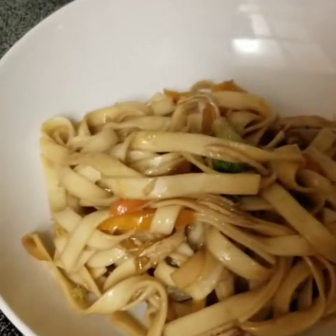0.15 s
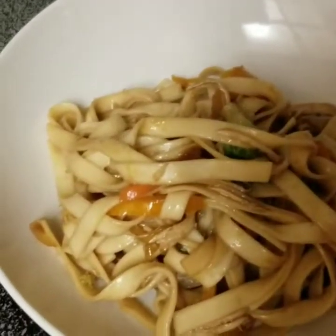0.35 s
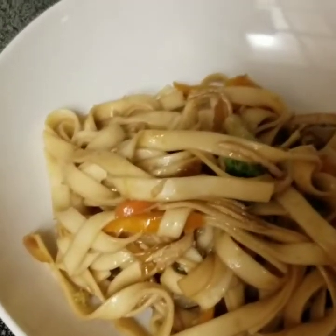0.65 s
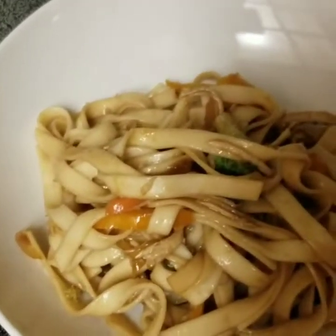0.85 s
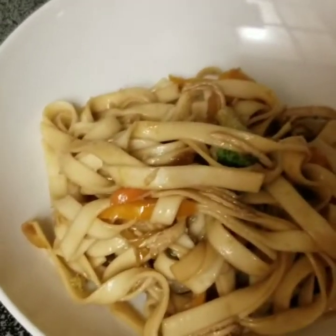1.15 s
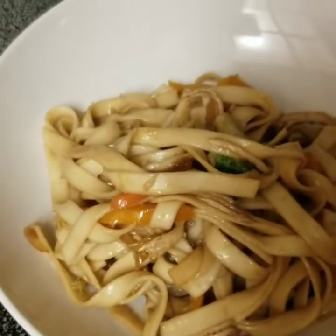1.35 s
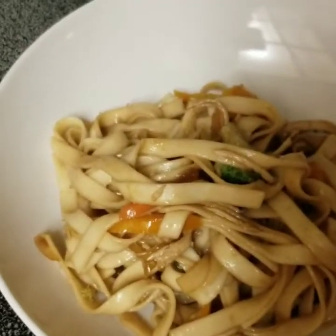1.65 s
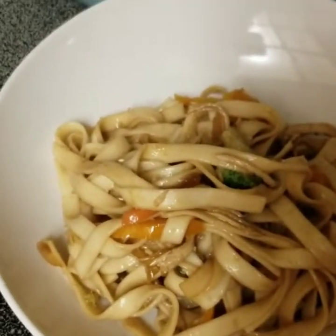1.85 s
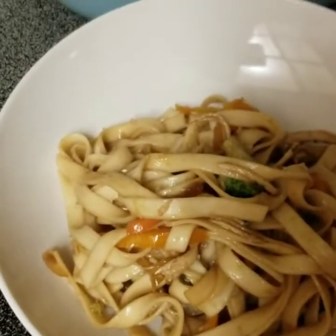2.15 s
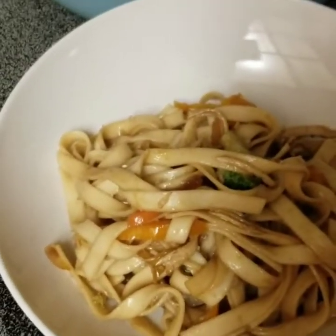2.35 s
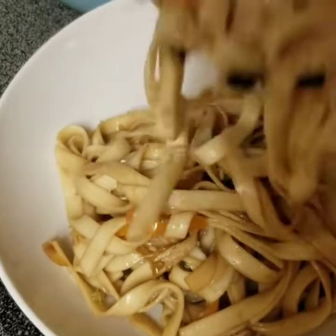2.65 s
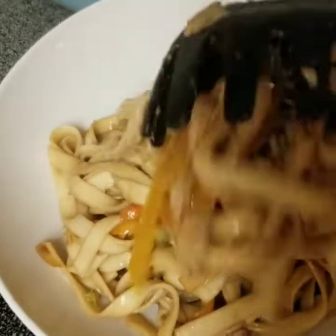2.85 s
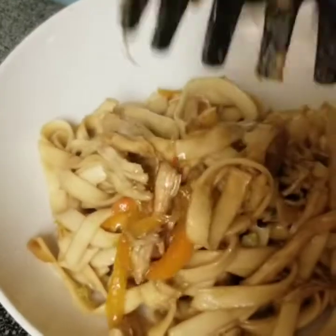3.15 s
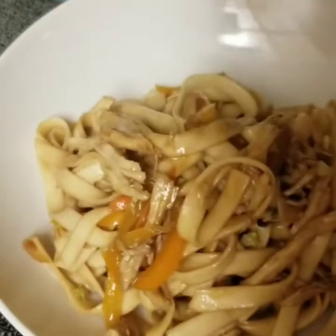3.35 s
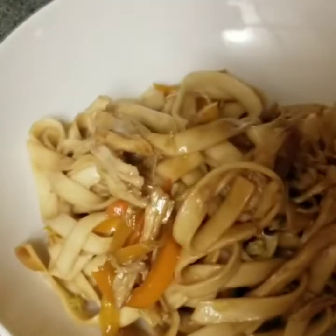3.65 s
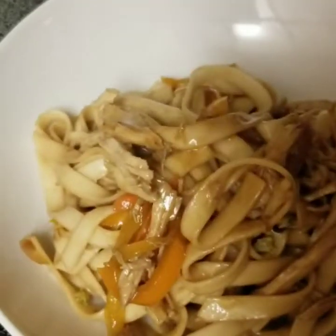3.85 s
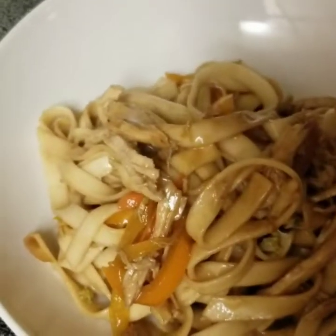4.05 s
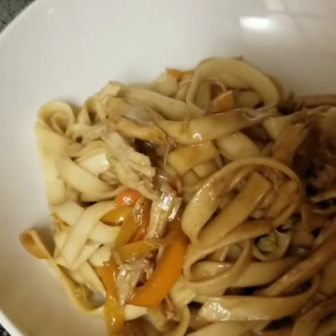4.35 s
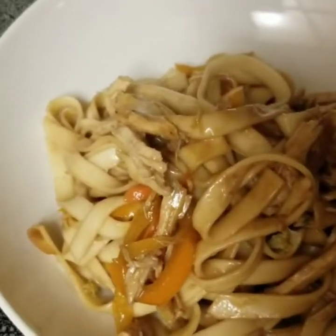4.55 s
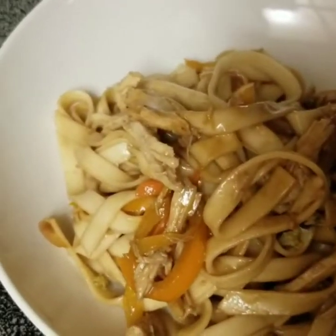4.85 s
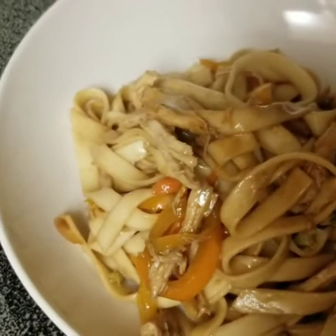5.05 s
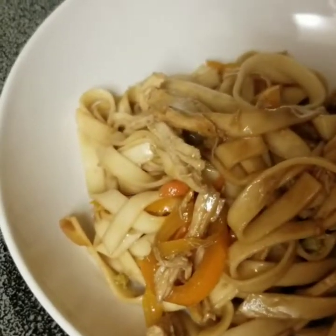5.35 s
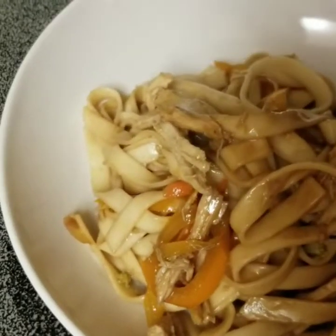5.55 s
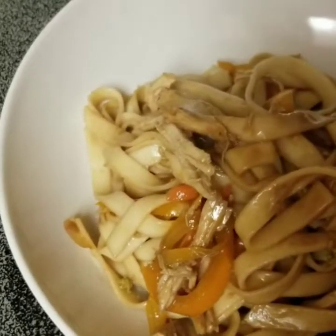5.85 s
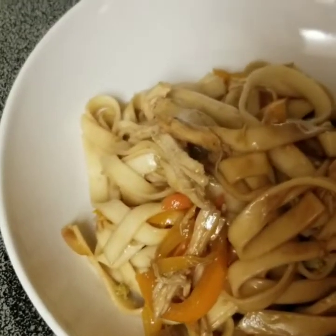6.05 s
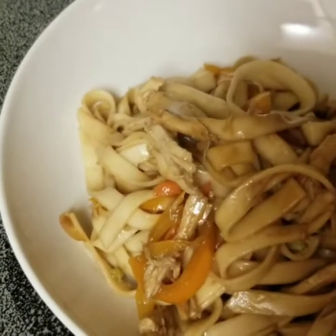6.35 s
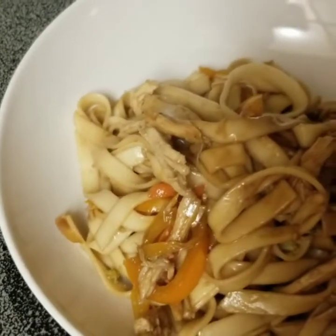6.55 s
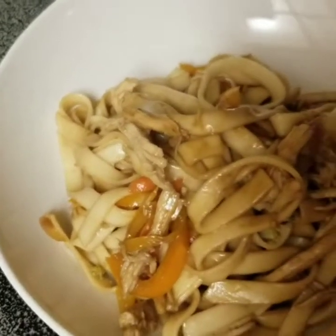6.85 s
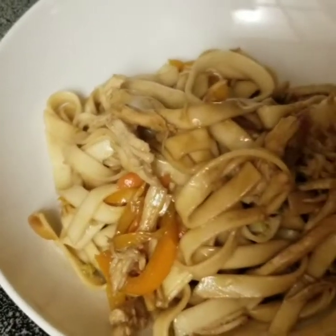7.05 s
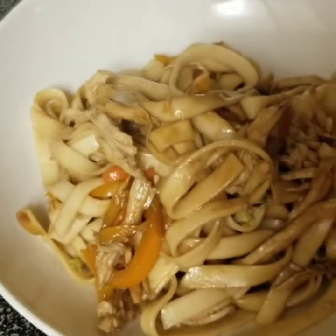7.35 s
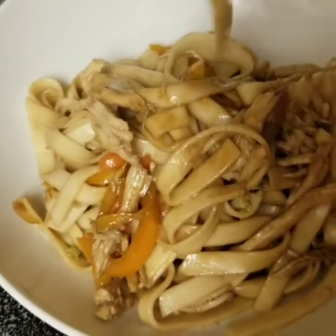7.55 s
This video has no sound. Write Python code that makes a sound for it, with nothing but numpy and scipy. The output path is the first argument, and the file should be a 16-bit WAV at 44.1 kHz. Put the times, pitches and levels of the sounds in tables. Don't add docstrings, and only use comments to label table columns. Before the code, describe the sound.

In a small kitchen, a low fan rumble and mains hum run under a faint simmering hiss. Close to the microphone, tongs strike a dish in a loud bouncing clatter near the start, with a short scrape. Small wet noodle ticks follow, then another clatter before four seconds, a short rattle, soft taps and a dense heavier clatter around five and a half. Only faint ticks and taps remain.

```python
import sys
import numpy as np
from scipy import signal
from scipy.fft import rfft, irfft, next_fast_len
from scipy.io import wavfile
from scipy.ndimage import uniform_filter1d, map_coordinates

SR = 44100
rng = np.random.default_rng(int(sys.argv[2]) if len(sys.argv) > 2 else 0)


def to_wav(sig):
    pcm = np.clip(np.atleast_2d(sig), -1, 1) * 32767
    pcm = np.round(pcm).astype(np.int16)
    wavfile.write(sys.argv[1], SR, pcm.T)


def makeup_ratio(level_db):
    decades = np.asarray(level_db, float) / 20
    return 10 ** decades


N = 340011
HZ = np.fft.rfftfreq(next_fast_len(N + SR // 2), 1 / SR)


def unit(x):
    return x / np.sqrt(np.mean(x ** 2) + 1e-20)


def along(points, hz=HZ):
    f, v = np.transpose(points)
    return np.interp(np.log(hz + 1), np.log(f + 1), v)


def curves(rows):
    s, *cols = np.transpose(rows)
    return [np.interp(np.arange(N) / SR, s, c) for c in cols]


def wobble(rate):
    knots = rng.standard_normal(int(N * rate / SR) + 4)
    return map_coordinates(knots, [np.arange(N) * rate / SR])


def filtered(x, response):
    m = next_fast_len(N + SR // 2)
    return irfft(rfft(x, m) * response, m)[..., :N]


def ringing(peaks):
    total = 0
    for k, (c, width, db) in enumerate(peaks):
        total = total + (-1) ** k * makeup_ratio(db) * 1j * HZ * width / (c * c - HZ * HZ + 1j * HZ * width)
    return total


def causal(gain):
    cepstrum = irfft(np.log(gain + 1e-6))
    half = len(cepstrum) // 2
    cepstrum[1:half] *= 2
    cepstrum[half + 1:] = 0
    return np.exp(rfft(cepstrum))


def sides(pan_db):
    return makeup_ratio(np.array([[.5], [-.5]]) * pan_db)


def ports(pair, alike, lean, lead_s=0):
    turn = np.arccos(np.clip(along(alike), -1, 1)) / 2
    mid, side = filtered(pair, np.array([np.cos(turn), np.sin(turn)]))
    lead = np.exp(np.array([[1j], [-1j]]) * np.pi * HZ * lead_s)
    return filtered(np.array([mid + side, mid - side]), sides(along(lean)) * lead)


def rush(gain, patchy_db):
    # hz, likeness
    room_alike = [(60, 1), (130, 0.91), (290, 1), (640, 0.89), (1410, -0.039), (3100, 0.11), (6820, -0.14),
                  (15000, -0.13)]
    # hz, left_over_right_db
    room_lean = [(60, 1), (110, -0.5), (200, 2), (380, 0.5), (700, -0.5), (1290, 4.5), (2380, 2),
                 (4400, 2.5), (8120, -2), (15000, -6.5)]
    z = signal.stft(rng.standard_normal((2, N)), nperseg=512)[2]
    field = uniform_filter1d(rng.standard_normal(z.shape[1:]), size=8, axis=0)
    field = uniform_filter1d(field, size=10, axis=1)
    pair = signal.istft(z * makeup_ratio(patchy_db * unit(field)), nperseg=512)[1][:, :N]
    both = ports(filtered(pair, gain), room_alike, room_lean, lead_s=0.000305)
    return both / np.sqrt(np.mean(both.mean(0) ** 2))


def fan():
    # start_s, swell_db, rumble_centre_hz
    duct = [(0, -46, 69.5), (.3, -41.5, 67.9), (.6, -49.5, 59.2), (1.2, -49, 58.4), (1.45, -56, 69.1),
            (2, -41, 76.25), (2.4, -40.5, 80.66), (2.6, -41, 58), (3.3, -44, 58), (3.55, -42, 72.1),
            (3.9, -42.5, 70.25), (4.15, -42.5, 58.97), (4.75, -42, 61.1), (5.3, -44.5, 78.05),
            (5.65, -42.5, 63.57), (6.05, -39, 61.7), (6.8, -45, 62.2), (7.2, -41.5, 69.63)]
    # hz, level_db_per_hz
    air = [(8.8, -48), (15, -29), (27, -16), (35, -11.5), (48, -7), (70, -2.5), (97, -8), (125, -8),
           (146, -16.5), (231, -11.5), (429, -22), (520, -20.5), (681, -30), (825, -27), (1500, -43),
           (1950, -55), (3300, -120)]
    swell_db, centre_hz = curves(duct)
    swell_db = swell_db - swell_db.mean()
    flutter = 4.1 + wobble(11)
    rumble_turn = 2 * np.pi * np.cumsum(centre_hz + 6 * wobble(9.8)) / SR
    rumble = unit(np.real(flutter * np.exp(1j * rumble_turn)))
    hum_swing = 5.5 + 0.32 * wobble(4.9) + .8j * wobble(24)
    hum_turn = 2 * np.pi * np.cumsum(119 + 3 * wobble(4)) / SR
    hum = unit(np.real(hum_swing * np.exp(1j * hum_turn)))
    flow = makeup_ratio(-41 + 0.15 * swell_db + 0.15 * wobble(11.0)) * rush(makeup_ratio(along(air)), patchy_db=0.6)
    return flow + makeup_ratio(-46.5 + 1.7 * swell_db) * rumble + makeup_ratio(-48.5 + 0.15 * swell_db) * hum


def hiss():
    # start_s, level_db
    simmer = [(0.0, -59.5), (0.47, -59.5), (1.33, -63.5), (2.17, -59.5), (3.13, -62), (3.35, -62.5),
              (3.99, -58), (4.14, -61), (4.76, -58), (5.26, -62), (5.39, -56.5), (5.71, -60), (5.91, -60),
              (6.18, -61), (6.61, -61), (7.54, -63), (7.71, -60.5)]
    # hz, level_db_per_hz
    dull = [(590, -47), (1000, 0.5), (1190, -9.5), (1590, -4), (1730, -8.5), (2100, -3.5), (2280, -6),
            (3590, -8), (3990, -5.5), (7000, -12.5), (9100, -66), (15400, -120)]
    # hz, level_db_per_hz
    bright = [(3530, -27), (6000, -9), (7160, -1.5), (7900, 0), (10500, -4), (12400, 1), (15100, -2),
              (16000, -5.5)]
    simmer_db, = curves(simmer)
    simmer_db = simmer_db - simmer_db.mean()
    earlier_db = 8.5 * np.exp(-np.arange(N) / SR / 0.031)
    flicker = wobble(25)
    low_db = -62 + 0.93 * simmer_db + earlier_db + .5 * flicker
    fizz_db = -63.5 + 0.66 * simmer_db + 0.97 * flicker + 1.34 * wobble(80)
    low = makeup_ratio(low_db) * rush(makeup_ratio(along(dull)), patchy_db=1.5)
    return low + makeup_ratio(fizz_db) * rush(makeup_ratio(along(bright)), patchy_db=0.6)


def steam():
    # start_s, end_s, pitch_hz, width_hz, level_db
    puffs = [
        (1.72, 3, 8000, 1200, -74),
        (0.64, 1.09, 9900, 1200, -74.5),
        (6.3, 6.75, 4100, 500, -72),
        (0.7, 1, 2150, 540, -70),
        (5.93, 6.03, 10000, 4000, -68),
        (3.93, 4, 11000, 4000, -66),
    ]
    t, fade_s = np.arange(N) / SR, 0.074
    out = np.zeros((2, N))
    for s, end, hz, width, db in puffs:
        fade = np.interp(t, [s - fade_s, s, end, end + fade_s], [0, 1, 1, 0])
        out += makeup_ratio(db) * fade * rush(np.exp(-((HZ - hz) / width) ** 2), patchy_db=4.0)
    return out


def ticks():
    # start_s, peak_db, pitch_hz, pan_db
    snaps = [(0.0633, -45, 14300, -5.5), (1.0323, -44, 11700, -14), (1.1493, -47, 11680, -12),
             (1.5707, -48, 5040, -3), (1.5994, -44, 8570, -2.5), (1.6362, -44, 12700, -3.5),
             (1.833, -45, 15300, 1), (1.9835, -49, 8620, -1.5), (2.6993, -41, 14200, -17),
             (2.7243, -50, 4756, -5), (2.7472, -33.5, 5340, -5), (2.816, -45, 4670, -4),
             (3.958, -46, 5146, -4.5), (4.0537, -47, 7970, -6), (5.0732, -44, 13030, -15),
             (5.766, -41, 7660, -8), (6.0051, -48, 5140, -1.5), (6.8018, -34.5, 10400, -9),
             (7.186, -43, 4690, -1), (2.0068, -47, 4480, -1.5), (2.8933, -50, 5580, -3.5),
             (4.7905, -46, 4190, -4), (5.727, -45, 4500, -3), (6.018, -46, 4300, -3),
             (6.186, -48, 4080, -4)]
    # start_s, peak_db, pitch_hz, pan_db, t60_s
    squelches = [(0.0827, -46, 12300, -5.0, 0.015), (0.7243, -40, 14100, -10, 0.015),
                 (0.8916, -41.5, 8800, -12, 0.013), (1.726, -37, 15500, -4.0, 0.015),
                 (2.1894, -45, 7230, -3.0, 0.015), (2.6733, -38, 15500, -8.5, 0.015),
                 (3.256, -46, 12200, -3.0, 0.015), (3.5028, -47, 13700, -3.5, 0.015),
                 (3.5623, -52, 12800, -4.0, 0.015), (3.6444, -56, 6550, -2.5, 0.015),
                 (3.6815, -46, 12000, -4.0, 0.015), (3.7489, -50, 8010, -3.5, 0.015),
                 (3.9255, -50, 13100, -3.5, 0.015), (3.9589, -41, 8340, -5.0, 0.015),
                 (3.9744, -40, 12000, -4.5, 0.015), (4.0694, -42, 14700, -4.5, 0.015),
                 (4.4861, -42, 14000, -6.5, 0.015), (5.1377, -51, 12300, -4.0, 0.015),
                 (5.5104, -42, 12700, -9, 0.015), (5.5644, -47, 8350, -8, 0.015),
                 (5.6695, -46, 12400, -5.5, 0.015), (5.6974, -51, 12400, -5.0, 0.015),
                 (5.7554, -42, 7660, -6.0, 0.015), (5.7773, -35, 12200, -16, 0.017),
                 (5.7944, -53, 13100, -4.5, 0.015), (5.9339, -47, 7530, -2.5, 0.015),
                 (5.9834, -46, 7430, -2.5, 0.015), (6.1794, -41, 13400, -5.5, 0.015),
                 (6.1854, -45, 7330, -4.5, 0.015), (6.7885, -39, 10900, 0, 0.015)]
    out, t = np.zeros((2, N + SR)), np.arange(SR // 15) / SR
    rows = [(*row, 0.0076, 1e-5) for row in snaps]
    rows += [(s, db - 3.5, *rest, .001) for s, db, *rest in squelches]
    for s, db, hz, pan_db, t60, rise_s in rows:
        b, a = signal.iirpeak(min(hz, 15000), 2.7, SR)
        shape = makeup_ratio(-60 * t / t60) * (1 - np.exp(-t / rise_s))
        burst = rng.standard_normal((2, len(t))) * shape
        shared = burst[:1] + .6 * burst
        snap = signal.lfilter(b, a, signal.lfilter(b, a, shared))
        out[:, round(s * SR):][:, :len(t)] += makeup_ratio(db) * sides(pan_db) * snap / np.abs(snap).max()
    return out[:, :N]


def catches():
    # start_s, peak_db, pitch_hz
    grabs = [
        [(0.28, -34, 964), (0.295, -30, 1300), (0.3, -32, 1350), (0.291, -40, 1400), (0.305, -31, 1380),
         (0.31, -33, 1410), (0.315, -27.5, 1440), (0.327, -35, 1040), (0.333, -35, 1030), (0.339, -30, 1000),
         (0.35, -33, 950), (0.355, -30, 960), (5.252, -36.5, 1050), (5.256, -37, 1030), (5.272, -34, 976),
         (5.294, -38, 1050), (5.306, -37, 1000), (5.311, -35, 1000), (5.32, -43, 888)],
        [(0.2994, -37, 2430), (0.298, -38, 2850), (0.304, -39, 2850), (5.291, -41, 2600), (0.3494, -42, 2620),
         (0.3554, -40, 2720), (3.7854, -37, 2130), (3.7934, -36, 2151), (5.2594, -39, 2140),
         (5.2704, -47, 2527), (5.2804, -50, 2530), (5.2854, -40, 2550), (5.2959, -32.5, 2600),
         (5.3164, -45, 2320), (6.0262, -48, 2070)],
        [(0.2838, -37, 3600), (5.1896, -47, 4100), (5.184, -45, 6800), (5.192, -42, 1210), (5.3014, -51, 4500),
         (5.7648, -48, 3360)],
    ]
    out, t = np.zeros((2, N + SR)), np.arange(SR // 16) / SR
    rise_s, t60_s = 0.003, 0.018
    shape = (1 - np.exp(-t / rise_s)) * makeup_ratio(-60 * t / t60_s)
    for s, db, hz in sum(map(list, grabs), []):
        rough = 1 + 0.24 * unit(uniform_filter1d(rng.standard_normal((2, len(t))), size=40))
        turn = rng.uniform(0, 2 * np.pi, (2, 1)) * [[0], [1]]
        ring = np.sin(2 * np.pi * hz * t + turn)
        out[:, round(s * SR):][:, :len(t)] += makeup_ratio(db + 9) * shape * rough * ring
    return out[:, :N]


def scrapes():
    # full_grip_s, let_go_s, level_db, sag_by_let_go_db, ring_db
    drags = [
        (0.288, 0.374, -39, 8.5, -11.5),
        (0.471, 0.502, -30.5, 5.5, -6),
        (3.789, 3.833, -38, 6, -11),
        (5.251, 5.333, -45.5, 1.5, -11),
        (3.762, 3.777, -51, -1, -12),
    ]
    # pitch_hz, width_hz, level_db
    rubbed = [
        [(1000, 97, 4.5), (1400, 76, 13), (2410, 50, -33)],
        [(440, 100, -2), (1240, 110, -6), (3800, 72, -11.5)],
        [(2110, 58, 0), (6420, 38, 4), (8020, 47, -7)],
        [(1010, 95, 3.5), (2620, 41, -5)],
        [(1900, 200, 0), (4100, 300, 0)],
    ]
    # hz, level_db_per_hz
    rasps = [
        [(350, -33), (600, -4), (875, -14), (988, -1), (1420, -8), (1740, -8), (15000, -29.5)],
        [(150, -38), (250, -4), (935, 1), (1090, -11), (1290, -12), (3270, -23), (3880, -10.5), (15000, -47)],
        [(410, -25), (700, -6), (1560, 0.5), (1760, -8), (3540, -13), (3770, -6), (8210, -15), (15500, -35)],
        [(350, -41), (600, -6), (977, -4), (1630, -19), (2560, -12), (2930, -17), (9000, -30.5), (11700, -64),
         (19800, -120)],
        [(600, -30), (1200, -5), (2200, 1), (3300, -10), (4100, -10), (7000, -15), (15000, -30)],
    ]
    # upper_share_at_grip, upper_share_at_let_go, loudest_ring_s
    slides = [(0.84, -.4, 0.306), (1.1, -0.075, 0.466), (.02, 0.5, 3.796), (0.17, 0.51, 5.297),
              (.4, .6, 3.765)]
    rises = [0.023, 0.0019, 0.0049, 0.0091, 0.0074]
    out, t = np.zeros((2, N)), np.arange(N) / SR
    for drag, body, rasp, (*slide, sing), rise_s in zip(drags, rubbed, rasps, slides, rises):
        grip, end, db, sag_db, ring_db = drag
        held_db = np.interp(t, [grip - rise_s, grip, end], [-17, 0, -sag_db])
        after = np.maximum(t - end, 0)
        level_db = db + held_db + np.maximum(-1300 * after, -15 - 290 * after)
        upper = np.clip(np.interp(t, [grip, end], slide) + 0.4 * wobble(45), 0, 1)
        sing_db = 9.5 * np.exp(-((t - sing) / 0.027) ** 2)
        ring_db = ring_db + wobble(45) + sing_db
        grains = rng.standard_normal((2, N)) * makeup_ratio(2.2 * wobble(300) + .7 * wobble(90))
        low = unit(filtered(grains, ringing(body[:1])))
        high = unit(filtered(grains, ringing(body[1:])))
        broad = unit(filtered(grains, causal(makeup_ratio(along(rasp)))))
        rings = makeup_ratio(ring_db) * ((1 - upper) * low + upper * high)
        out += makeup_ratio(level_db) * (broad + rings) * (t > grip - rise_s)
    return out


def knocks():
    # start_s, peak_db, crack_db, heft_db
    gestures = [
        [(0.4436, -27, -10, 3), (0.4449, -13, -4.5, -6), (0.4456, -17, -1.5, 5), (0.4483, -14, -17, 2),
         (0.4508, -13, -12, 10), (.4533, -16, -7.5, 10), (0.4585, -16.5, -20, 9.5), (0.4612, -27, -8, 6),
         (0.4679, -10.5, -17.5, -11), (.4715, -24.5, -10, 9), (0.4775, -24, -15, 2), (0.484, -27, -7, -4),
         (.490, -29, -12, 6), (0.4955, -26, -14, 10), (0.499, -26, -18, 8), (0.504, -28, -14, 7),
         (0.509, -36, -14, 0)],
        [(3.707, -53, -27, 4), (3.7779, -13, -21.5, -0.5), (3.7808, -20.5, -22, 5.5), (3.7835, -22, -26, 9),
         (3.7895, -26, -18, 0), (3.796, -32, -15, 3), (3.8015, -25, -6.5, 2), (3.806, -29, -9, 3),
         (3.812, -33, -10, 0), (3.8195, -28, -9, 4), (3.823, -31, -7, 5), (3.827, -43, -7, -2)],
        [(4.7181, -19, -9.5, -6), (4.7191, -20, -14, -3), (4.7215, -20, -15, -2), (4.7235, -22, -15, 5),
         (4.7257, -26, -8, 5.5), (4.731, -34, -12, -5), (4.752, -34.5, -13, -8)],
        [(5.1835, -25, -21, 3), (5.191, -31.5, -25, 3)],
        [(5.4102, -34, -18, -5), (5.4117, -19.5, -19.5, 0), (5.4132, -19, -18.5, -4), (5.4152, -18.5, -19, 1.5),
         (5.4172, -18, -18.5, 6), (5.4198, -18.5, -24, 6.5), (5.4235, -20, -25, 2), (5.4288, -29, -24, 7),
         (5.461, -49.5, 2, 0)],
        [(7.1856, -55, -6, 0), (7.6024, -61, 9, 0), (7.6276, -41.5, -6, -3), (7.6444, -41.5, -20, 0)],
    ]
    # pitch_hz, width_hz, level_db
    bodies = [
        [(170, 92, 5), (397, 61, 9), (525, 37, 4), (910, 74, 4), (1263, 55, 5), (1370, 70, 6), (1620, 110, 3.5),
         (2190, 79, 4.5), (2560, 53, -14), (3900, 90, -5), (4200, 170, -11), (5200, 160, -11), (5600, 110, -26),
         (7900, 330, -32)],
        [(250, 100, -3), (377, 150, 1), (550, 100, 2), (1114, 70, 3), (1330, 60, 2.5), (1560, 59, 0),
         (2140, 40, 5), (2530, 100, -11), (2850, 150, -9), (3800, 180, -3.5), (4150, 60, -4), (4500, 100, -4),
         (5180, 100, -12)],
        [(463, 27, 14), (288, 27.6, 5.5), (748, 45, 8), (964, 180, 2), (1100, 83, 5), (1226, 46, 13),
         (1536, 28, 14.5), (2080, 120, -4), (2560, 65, -8), (3740, 124, -3), (3970, 37, 4.5), (4500, 160, -7),
         (170, 51, 4)],
        [(350, 125, -15), (1195, 300, -24), (4210, 380, -10), (6900, 410, -11)],
        [(170, 59, 10.5), (258, 61, 1), (364, 55, 10), (510, 55, -9), (880, 55, 5), (1345, 78, 9),
         (1610, 89, -5), (2113, 170, -1), (2590, 57, -2), (4100, 196, 1), (4400, 130, -3.5), (5160, 100, -1)],
        [(1630, 500, -2.5), (2600, 396, -9)],
    ]
    # hz, level_db_per_hz
    thuds = [
        [(59, -42), (100, -14), (407, 13.5), (693, -33), (1280, -18), (2000, -22), (3350, -45), (4120, 2.5),
         (6000, -34), (7800, -62), (13200, -120)],
        [(120, -37), (200, -23), (431, 11.5), (900, -0.5), (1410, -16), (3070, -4), (3810, -33), (6000, -38),
         (7800, -63), (13200, -120)],
        [(88, -40), (150, 9), (463, -13), (927, -19), (1260, -6), (2170, -15), (3090, -21), (3890, -15),
         (6000, -23), (7800, -61), (13200, -120)],
        [(150, -41), (250, 17), (1300, -7.5), (2560, -27), (4130, -29), (6000, -40), (7800, -70), (13200, -120)],
        [(59, -32), (100, -8), (374, 7), (730, -4), (1380, -29), (2640, -36), (3020, -43), (4050, -29),
         (6000, -32), (7800, -67), (13200, -120)],
        [(710, -38), (1200, -10), (1800, 1), (3450, -2), (6000, -12), (7800, -46), (13200, -120)],
    ]
    # rattle_t60_s, crack_t60_s, rattle_db
    damping = [(0.02, 0.029, 5), (.018, 0.032, 4), (0.023, 0.035, 5), (0.04, 0.029, 9), (.016, 0.035, 5),
               (0.024, 0.019, 14)]
    presses = [0.00044, .0003, 0.00038, .0005, .0005, .0003]
    out, t = np.zeros((2, N)), np.arange(SR // 8) / SR
    deep = 1 / (1 + (HZ / 650) ** 2)
    sharp = 1 - 1 / (1 + (HZ / 3530) ** 4)
    crack_tone = ringing([(4160, 500, -17), (7740, 2840, 1.9), (13000, 3200, -6)])
    for rows, body, thud, damp, press_s in zip(gestures, bodies, thuds, damping, presses):
        t60, crack_t60, rattle_db = damp
        light, heavy, crack = np.zeros((3, 2, N + len(t)))
        press = np.sin(np.pi * np.clip(t / press_s, 0, 1))
        for s, db, crack_db, heft_db in rows:
            here = np.s_[:, round(s * SR):round(s * SR) + len(t)]
            rattle = makeup_ratio(db + rattle_db - 60 * t / t60) * (1 - np.exp(-t / 0.00038))
            force = rattle * rng.standard_normal((2, len(t)))
            push = -makeup_ratio(db + np.array([[23], [13]])) * press / press.sum()
            light[here] += force + push
            heavy[here] += makeup_ratio(heft_db) * (0.53 * force + push)
            snap = makeup_ratio(db + crack_db + 2.5 - 60 * t / crack_t60) * (1 - np.exp(-t / 0.00028))
            crack[here] += snap * rng.standard_normal((2, len(t)))
        power = sum(np.abs(ringing([mode])) ** 2 for mode in body)
        ware = causal(np.sqrt(power + makeup_ratio(along(thud) - 8.5) ** 2))
        out += filtered(heavy[:, :N], ware * deep)
        out += filtered(light[:, :N], ware * (1 - deep) * (1 - sharp))
        out += filtered(crack[:, :N], crack_tone + makeup_ratio(17) * ware * sharp)
    return out


def kitchen(x):
    # hz, t60_s
    decay = [(200, 0.23), (2000, 0.25), (10000, 0.16)]
    hz, t, z = signal.stft(rng.standard_normal((2, SR // 2)), SR, nperseg=256)
    tail = signal.istft(z * makeup_ratio(-60 * t / along(decay, hz)[:, None]), SR, nperseg=256)[1]
    delayed = np.pad(x, ((0, 0), (150, 0)))
    return signal.fftconvolve(delayed, tail / np.linalg.norm(tail[0]), axes=1)[:, :N]


def scene():
    # hz, likeness
    near_alike = [(100, 1), (300, 1), (700, 0.31), (1400, 0.68), (3000, 0.093), (7000, -0.17),
                  (15000, 0.00087)]
    # hz, left_over_right_db
    near_lean = [(60, -1), (110, 2), (200, 4), (380, -3.5), (700, -3), (1290, 5), (2380, 0), (4400, 0),
                 (8120, -4), (15000, -12)]
    near = knocks() + scrapes() + catches()
    near = ports(near + makeup_ratio(-14.5) * kitchen(near), near_alike, near_lean)
    return near + ticks() + fan() + hiss() + steam()


def roll_off(x):
    return signal.sosfilt(signal.butter(12, 15820, fs=SR, output="sos"), x)


def record(dry):
    heard = filtered(dry, HZ < 15820)
    return roll_off(heard)


dry = scene()
out = record(dry)
to_wav(out)
```